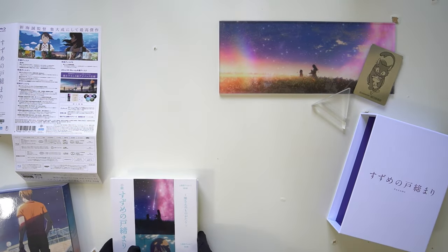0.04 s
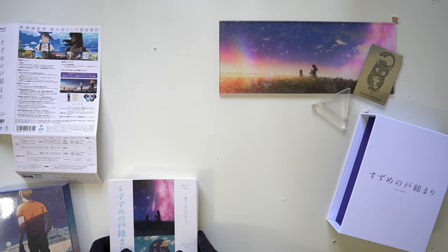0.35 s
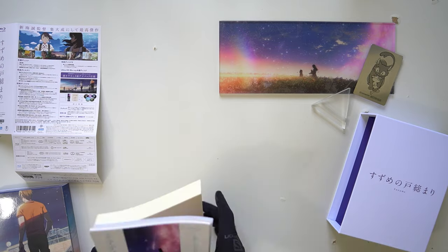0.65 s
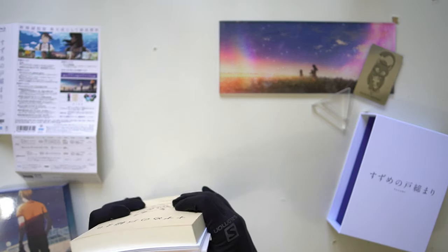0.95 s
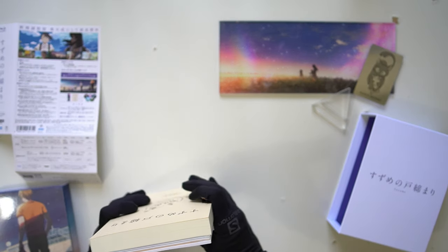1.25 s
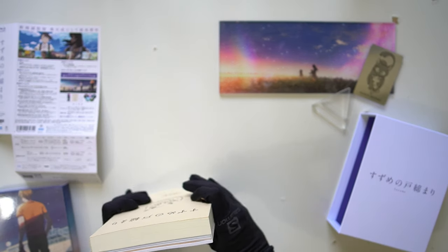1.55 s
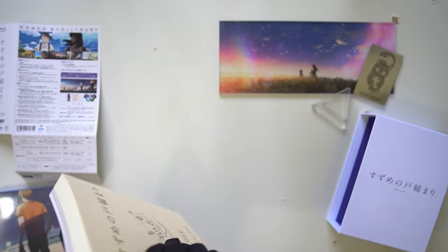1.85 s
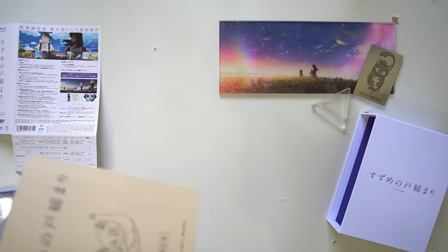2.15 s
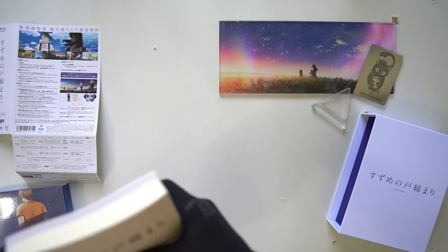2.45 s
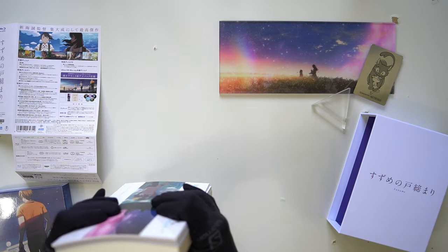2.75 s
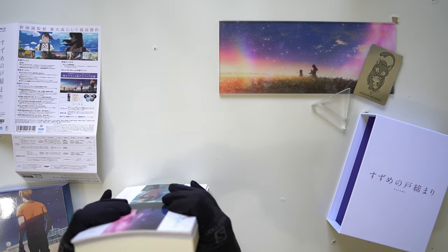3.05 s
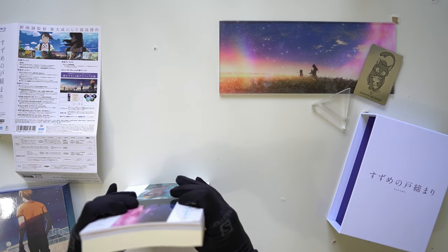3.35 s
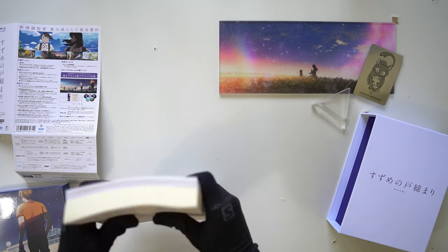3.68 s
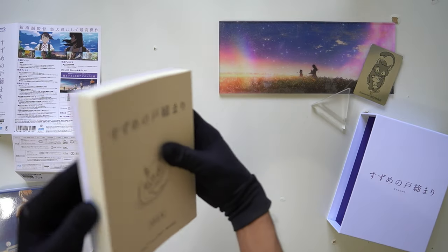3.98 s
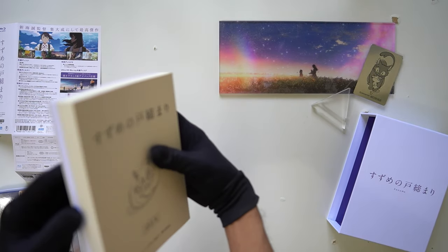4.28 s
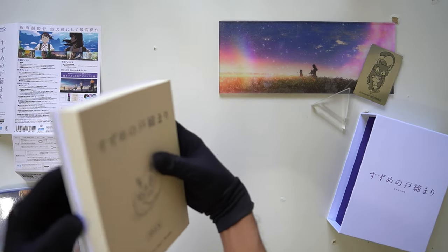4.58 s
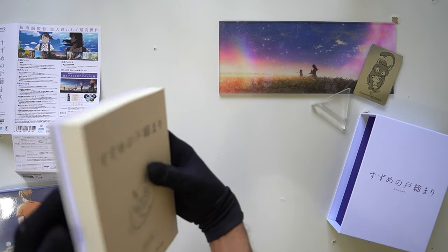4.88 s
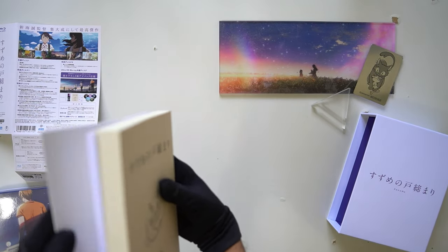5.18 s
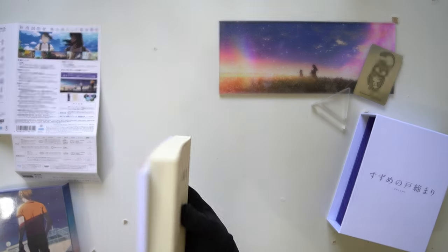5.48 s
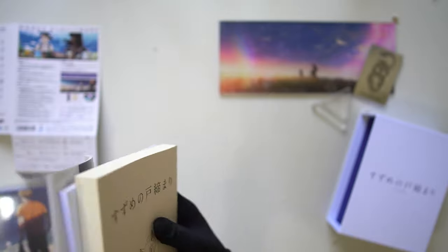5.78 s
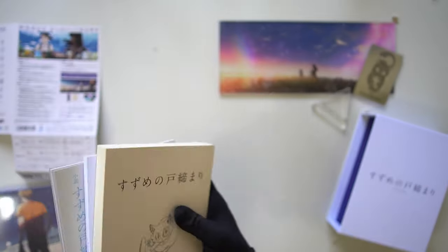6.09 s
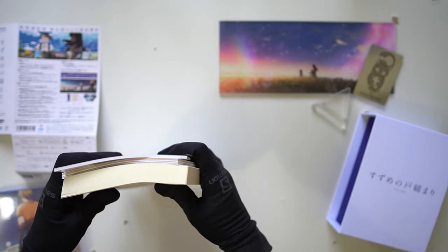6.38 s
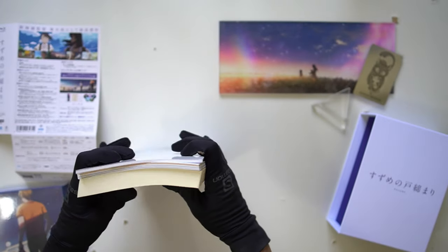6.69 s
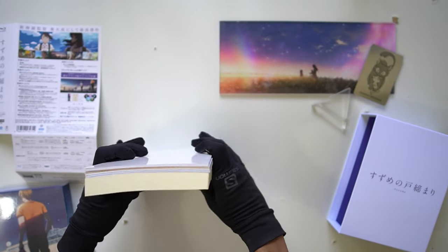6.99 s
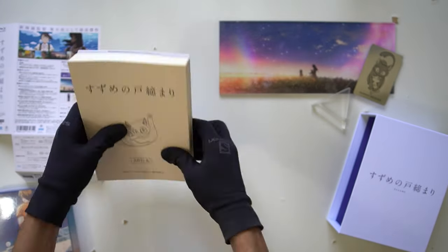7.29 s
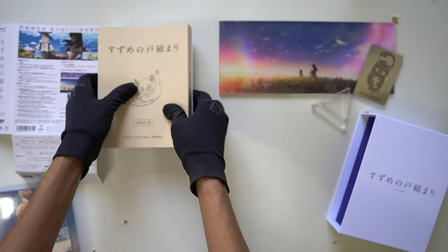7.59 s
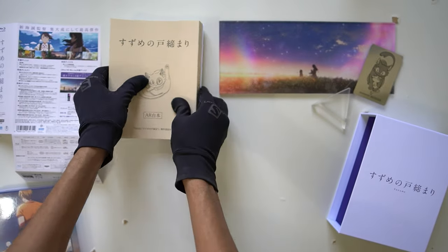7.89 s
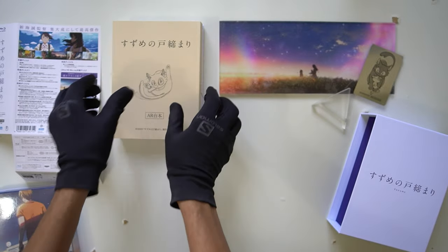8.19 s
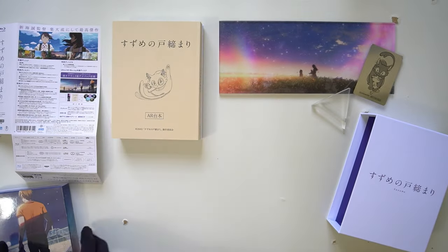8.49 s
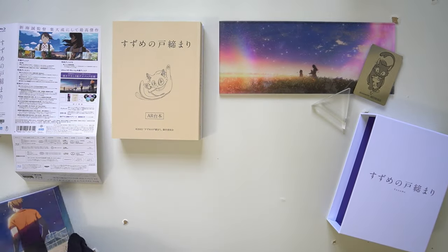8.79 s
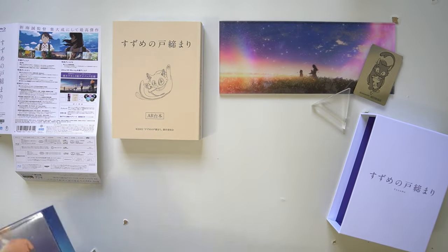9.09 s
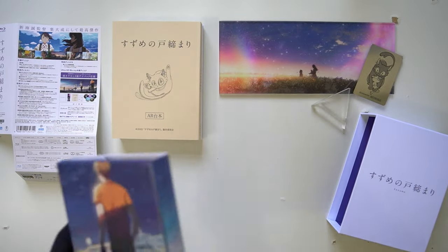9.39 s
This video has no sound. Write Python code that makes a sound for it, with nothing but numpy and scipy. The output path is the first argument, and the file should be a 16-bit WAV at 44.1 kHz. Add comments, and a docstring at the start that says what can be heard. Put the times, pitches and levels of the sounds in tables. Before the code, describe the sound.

Gloved hands handle a thick paperback and a few booklets close to a stereo microphone, in a small quiet room with a low hum. The stack is knocked square on a table in two early bouts, each with booming thuds and slapping pages. Covers slide and flap, and one sheet whisks past another. A third run of knocks follows, then the stack is laid down softly and a case is picked up.

```python
"""Squaring books on a table

Close stereo microphone in a small quiet room with a low steady hum. Gloved hands turn a thick paperback
and a few booklets over and knock the stack square three times: the table booms and rings, the pages slap.
Covers slide and flap, one sheet whisks past another, then the stack is laid down and a case is picked up.
A limiter holds the loudest knocks down."""
import sys
import numpy as np
from scipy import signal
from scipy.fft import rfft, irfft, next_fast_len
from scipy.io import wavfile
from scipy.ndimage import uniform_filter1d, minimum_filter1d, map_coordinates

SR = 44100
rng = np.random.default_rng(int(sys.argv[2]) if len(sys.argv) > 2 else 0)


def dump(signal):
    """Clip the signal to [-1, 1] and save it as 16-bit WAV at the path in sys.argv[1]."""
    limited = np.clip(np.atleast_2d(signal).T, -1, 1)
    pcm = np.round(limited * 32767).astype(np.int16)
    wavfile.write(sys.argv[1], SR, pcm)


N = 416304

# how alike nearby sounds are on the two channels: (frequency [Hz], left-right likeness [0-1])
CLOSE_LIKENESS = [(150, 1), (330, 0.97), (650, 0.83), (1200, 0.66), (2500, 0.54), (6000, 0.44),
                  (12000, 0.34)]


def amp(db):
    """Decibels to gain."""
    return 10 ** (np.asarray(db) / 20)


def unit(x):
    """Scale to rms 1."""
    return x / np.sqrt(np.mean(x ** 2) + 1e-20)


def along(points, hz):
    """Read (frequency [Hz], value) points on a log axis."""
    freqs, values = np.transpose(points)
    return np.interp(np.log(hz + 1), np.log(freqs + 1), values)


def wobble(rate):
    """A smooth random curve, rate knots a second."""
    knots = rng.standard_normal(int(N * rate / SR) + 4)
    return map_coordinates(knots, [np.arange(N) * rate / SR])


def fade(t, t60):
    """Exponential decay, 60 dB down after t60 seconds."""
    return np.exp(-np.log(1000) * t / t60)


def add(track, start, sound):
    """Mix a sound in at start seconds."""
    part = track[:, round(start * SR):][:, :sound.shape[-1]]
    part += sound[..., :part.shape[-1]]


def filtered(x, response):
    """Filter x by a gain that is a function of frequency."""
    n = x.shape[-1]
    padded = next_fast_len(n + 8192)
    hz = np.fft.rfftfreq(padded, 1 / SR)
    return irfft(rfft(x, padded) * response(hz), padded)[..., :n]


def coloured(pair, gain, likeness=CLOSE_LIKENESS):
    """Two unrelated signals become a stereo pair of rms 1 with this gain and likeness over frequency."""
    def mid_side_gains(hz):
        angle = np.arccos(np.clip(along(likeness, hz), -1, 1)) / 2
        return gain(hz) * np.array([np.cos(angle), np.sin(angle)])
    mid, side = filtered(pair, mid_side_gains)
    return unit(np.array([mid + side, mid - side]))


def noise(spectrum, n, likeness=CLOSE_LIKENESS):
    """Stereo noise with a (frequency [Hz], level [dB]) spectrum."""
    return coloured(rng.standard_normal((2, n)), lambda hz: amp(along(spectrum, hz)), likeness)


def room_tone(air_db=-48, drift_rad=0.22, drift_rate=2.82):
    """Soft steady air noise under the slightly unsteady hum of mains and a fan."""
    # moving air: (frequency [Hz], relative level [dB])
    air_spectrum = [(12, -60), (20, -24), (70, -4.5), (85, -30.5), (103, -14.5), (122, -12.5), (148, -9),
                    (427, -15.5), (534, -19.5), (631, -17.5), (1670, -24.5), (2090, -28), (2270, -29.5),
                    (3750, -36), (15500, -48.5)]
    # that air across the two channels: (frequency [Hz], left-right likeness [0-1])
    air_likeness = [(60, 0.99), (180, 0.97), (550, 0.72), (1650, 0.41), (4970, 0.04), (15000, 0.23)]
    # mains and fan tones: (frequency [Hz], rms level [dB])
    hum_lines = [(100, -46.5), (145.3, -54), (188, -59), (776, -69), (872, -68.5), (921, -67.5)]
    t = np.arange(N) / SR
    hum = sum(amp(db) * np.sqrt(2) * np.sin(2 * np.pi * hz * t + drift_rad * wobble(drift_rate))
              for hz, db in hum_lines)
    return amp(air_db) * noise(air_spectrum, N, air_likeness) + hum


def hand_motion(creep_paper_db=-64.5, creep_glove_db=-59.5, restless_db=2, ease_s=0.087, speed_power=1.4):
    """Gains of paper hiss and glove rub: they grow with each stroke's speed, over a faint creep."""
    # the hands never quite stop rubbing while they hold the stack: (start [s], end [s])
    holding = [(0, 1.13), (1.65, 2.83), (3.3, 4.05), (5.45, 8.2), (8.5, 9.2), (9.35, 9.44)]
    # grip shifts: (start [s], speeding up [s], slowing down [s], paper hiss [dB], glove rub [dB])
    strokes = [(.24, 0.17, 0.089, -55.5, -54), (.46, .04, .03, -60, -48.5), (.53, 0.045, 0.13, -57.5, -49),
               (.67, .15, 0.086, -48, -55), (1.2, 0.026, .03, -53, -62), (1.594, 0.018, 0.032, -53, -41),
               (1.62, 0.078, 0.098, -70, -50), (1.74, 0.051, 0.034, -53.5, -63),
               (1.92, 0.079, .05, -61, -70), (2.035, 0.047, .06, -49.5, -51),
               (2.125, .075, 0.029, -47, -61), (2.45, 0.029, 0.03, -46.5, -50),
               (2.522, 0.037, 0.028, -42, -53), (2.56, 0.082, .15, -60, -57),
               (3.26, .24, 0.091, -53.5, -69), (3.59, .015, .05, -53, -51), (3.69, 0.052, 0.27, -57, -57),
               (5.135, 0.08, .17, -55, -44), (5.4, 0.12, .15, -57.5, -75), (5.69, .03, 0.14, -55, -59),
               (5.8, 0.038, 0.12, -53.5, -48), (5.95, 0.11, 0.22, -59, -56), (6.19, .1, 0.056, -49, -49),
               (6.315, 0.039, 0.1, -44.5, -48), (6.599, .048, 0.035, -45, -37.5),
               (6.81, 0.11, 0.1, -47.5, -45.5), (6.91, .08, .075, -46, -50), (7.13, 0.053, 0.44, -59, -60),
               (7.59, 0.16, 0.11, -61.5, -46.5), (7.88, .12, .045, -45.5, -44.5),
               (8.055, 0.039, 0.042, -49.5, -40.5), (8.462, 0.027, 0.24, -56.5, -66),
               (8.58, 0.28, 0.13, -64, -52), (9.205, .06, 0.045, -60.5, -58)]
    t = np.arange(N) / SR
    moving = sum(np.interp(t, [start - ease_s, start, end, end + ease_s], [0, 1, 1, 0])
                 for start, end in holding)
    creep = moving * amp(restless_db * wobble(rate=9))
    paper_power = (amp(creep_paper_db) * creep) ** 2
    glove_power = (amp(creep_glove_db) * creep) ** 2
    for start, speeding, slowing, paper_db, glove_db in strokes:
        fastest = start + speeding
        end = fastest + slowing
        sliding = (t > start) & (t < end)
        speed = np.sin(np.pi / 2 * np.interp(t[sliding], [start, fastest, end], [0, 1, 0]))
        paper_power[sliding] += (amp(paper_db) * speed ** speed_power) ** 2
        glove_power[sliding] += (amp(glove_db) * speed ** speed_power) ** 2
    return np.sqrt(paper_power), np.sqrt(glove_power)


def friction(spectrum, grain_db, judder_db, judder_rate):
    """Fibres catch and slip: dense grains of uneven size under an unsteady stroke."""
    grains = rng.standard_normal((2, N)) * amp(grain_db * wobble(rate=1500))
    hiss = coloured(grains, lambda hz: amp(along(spectrum, hz)))
    return unit(hiss * amp(judder_db * wobble(judder_rate)))


def rubbing():
    """Paper hisses on paper and gloves brush the covers, close to the microphone."""
    # paper sliding on paper: (frequency [Hz], relative level [dB])
    paper_spectrum = [(300, 0), (1500, -8), (3500, -2.5), (6000, -2.5), (9000, -2), (12000, -6),
                      (16000, -9)]
    # cloth on a cover: (frequency [Hz], relative level [dB])
    glove_spectrum = [(200, 4), (700, -7), (1600, -1), (3500, -8), (6000, -15.5), (12000, -47)]
    paper_gain, glove_gain = hand_motion()
    paper = paper_gain * friction(paper_spectrum, grain_db=1.5, judder_db=1.5, judder_rate=58)
    gloves = glove_gain * friction(glove_spectrum, grain_db=3.0, judder_db=2.5, judder_rate=74)
    return paper * amp([[.5], [1.5]]) + gloves * amp([[-.7], [-1]])  # left and right trims


def scuffed_notes(note_trim_db=5.5, scuff_trim_db=-4.5, scuff_t60=0.17, tick_db=6, tick_t60=0.0088):
    """Short damped notes with a scuff: covers flexing, and at 6.509 s a low table ring after the knock."""
    # damped notes: (time [s], note level [dB], pitch [Hz], scuff level [dB])
    notes = [(.247, -39, 182, -44), (0.5138, -33, 338, -62), (0.73, -33.5, 336, -66), (.799, -36, 265, -64),
             (1.611, -55, 404, -41.5), (2.179, -27.5, 257, -41), (2.49, -41, 294, -43),
             (2.577, -36.5, 256, -65), (3.606, -35, 1639, -39), (5.700, -30, 319, -28.5),
             (5.7092, -20.5, 1010, -51), (5.721, -16, 930, -47), (5.894, -25.5, 237, -37.5),
             (5.895, -28, 694, -55), (5.917, -36, 282, -41.5), (6.115, -33, 257, -60),
             (6.128, -39, 272, -34), (6.16, -32.5, 270, -37), (6.509, -25, 165, -52),
             (7.255, -42, 294, -61), (7.352, -42, 326, -50), (7.431, -44.5, 318, -45),
             (8.099, -36.5, 327, -49), (8.55, -34, 910, -32.5), (8.885, -37, 1700, -38),
             (9.346, -52, 350, -47)]
    # the scuff: (frequency [Hz], relative level [dB])
    scuff_spectrum = [(100, -2), (300, 4), (750, 0.5), (1700, -5), (3000, -6.5), (7000, -15.5),
                      (16000, -45)]
    ring_cycles, rise_s = 16.7, 0.00028
    out, t = np.zeros((2, N)), np.arange(SR // 4) / SR
    for start, note_db, hz, scuff_db in notes:
        note = amp(note_db + note_trim_db) * np.sin(2 * np.pi * hz * t) * fade(t, ring_cycles / hz)
        scuff_decay = fade(t, scuff_t60) + amp(tick_db) * fade(t, tick_t60)
        scuff = amp(scuff_db + scuff_trim_db) * noise(scuff_spectrum, len(t)) * scuff_decay
        add(out, start, (note + scuff) * (1 - np.exp(-t / rise_s)))
    return out


def page_slap(t, slap_db, corner_hz, trim_db=2, crack_db=3, crack_t60=0.0083):
    """Page edges crack down and flutter; a softer landing moves their whole band down."""
    # page edges landing: (frequency [Hz], relative level [dB])
    slap_spectrum = [(100, -15), (300, 3.5), (800, 6.5), (1500, 3.5), (2150, 2), (2650, 0), (3400, -0.5),
                     (5500, -4.5), (9000, -19), (16000, -28)]
    # a harder slap flutters longer: (slap level [dB], t60 [s])
    flutter_times = [(-29, 0.33), (-23.5, 0.42)]
    low_share, steepness = 0.081, 2.08

    def contact(hz):
        low_cut = hz / np.hypot(hz, low_share * corner_hz)
        high_cut = 1 / np.sqrt(1 + (hz / corner_hz) ** (2 * steepness))
        return amp(along(slap_spectrum, hz)) * low_cut * high_cut
    flutter_t60 = np.interp(slap_db, *np.transpose(flutter_times))
    decay = fade(t, flutter_t60) + amp(crack_db) * fade(t, crack_t60)
    return amp(slap_db + trim_db) * coloured(rng.standard_normal((2, len(t))), contact) * decay


def air_push(t, panel_db, corner_hz, trim_db=6, corner_share=0.32):
    """The book block pushes out air in one swing of pressure, longer for a soft landing."""
    phase = np.pi * (t * corner_hz * corner_share - 2 / 3)
    return amp(panel_db + trim_db) * (1 - 2 * phase ** 2) * np.exp(-phase ** 2)


def ring(modes, t):
    """Damped modes struck together; neighbours move against each other at the microphone."""
    hz, db, t60 = np.transpose(modes)[:, :, None]
    sign = (-1) ** np.arange(len(modes))[:, None]
    return np.sum(sign * amp(db) * fade(t, t60) * np.sin(2 * np.pi * hz * t), axis=0)


def table_frame(t, boom_db, thud_db, thud_trim_db=2):
    """The whole table booms on its legs and bends with a thud."""
    # bouncing on the legs: (frequency [Hz], relative level [dB], t60 [s])
    bounce_modes = [(55.9, 6, 0.39), (69, 5.5, 0.19)]
    # broad, heavy bending: (frequency [Hz], relative level [dB], t60 [s])
    bending_modes = [(93, 2.5, 0.052), (134, 1, 0.13), (157.5, -9, 0.3), (216, -1.5, 0.041),
                     (343, -13, 0.013)]
    return amp(boom_db) * ring(bounce_modes, t) + amp(thud_db + thud_trim_db) * ring(bending_modes, t)


def table_top(t, panel_db, centre_hz, trim_db=3, t60=0.18, focus_db=8, scatter_db=1, travel_s=0.00303):
    """The top's modes reach the microphone together, as one bending wave, after a short travel time."""
    # the top's higher modes: (frequency [Hz], relative level [dB])
    panel_modes = [(248, -1.5), (282, -3.5), (328, 4), (379, -4.5), (417, -3), (464, -12), (530, -7),
                   (584, -1.5), (703, -7), (770, -5), (824, -9.5), (905, -19), (947, -7.5), (1042, -5.5),
                   (1093, -16.5), (1147, -17), (1373, -9.5), (1416, -26), (1609, -11), (2051, -11.5)]
    hz, db = np.transpose(panel_modes)[:, :, None]
    db = db - focus_db * np.log2(hz / centre_hz) ** 2  # weaker away from the modes the blow drives best
    db = db + scatter_db * rng.standard_normal(hz.shape)
    modes = amp(db) * fade(t, t60) * np.cos(2 * np.pi * hz * (t - travel_s))
    return amp(panel_db + trim_db) * modes.sum(axis=0)


def knocks(rise_s=0.00035):
    """The stack meets the table: pages slap, air is pushed out, frame and top ring."""
    # landings: (time [s], boom [dB], thud [dB], panel ring [dB], most driven panel frequency [Hz],
    # page slap [dB], slap corner [Hz])
    landings = [(1.103, -31, -14.5, -19.5, 284, -26, 1030), (1.129, -58, -27, -22.5, 270, -30.5, 890),
                (1.2240, -32, -21.5, -19, 445, -21.5, 1080), (1.2370, -50, -52, -15.5, 1160, -21.5, 1440),
                (2.9160, -28, -15, -21.5, 480, -27.5, 870), (3.053, -58, -37, -47, 378, -59, 701),
                (3.1210, -31, -15, -16.5, 370, -22, 940), (6.4498, -35, -13.5, -23, 280, -29.5, 694),
                (6.6599, -30, -13.5, -20, 495, -24, 940), (6.7188, -45, -27, -16.5, 530, -22.5, 1040),
                (6.741, -55, -48, -26.5, 454, -28.5, 940), (6.8776, -38.5, -48, -26, 606, -32, 1420),
                (7.655, -37.5, -35.5, -58, 298, -57, 900), (8.110, -40, -42, -48.5, 320, -52, 880),
                (8.551, -48, -42, -38, 660, -40.5, 1370)]
    out, t = np.zeros((2, N)), np.arange(int(.7 * SR)) / SR
    for start, boom_db, thud_db, panel_db, centre_hz, slap_db, corner_hz in landings:
        pages = page_slap(t, slap_db, corner_hz)
        push = air_push(t, panel_db, corner_hz)
        table = table_frame(t, boom_db, thud_db) + table_top(t, panel_db, centre_hz)
        add(out, start, (pages + push + table) * (1 - np.exp(-t / rise_s)))
    return out


def trinket(start_s=1.237, level_db=-47, t60=0.96):
    """A small hard thing on the table rattles faintly, jolted by one hard knock."""
    # its narrow, bright rattle: (frequency [Hz], relative level [dB])
    rattle_spectrum = [(2400, -30), (3000, -14), (3350, 2.5), (3750, -10), (4200, -3), (4800, -10),
                       (6000, -27)]
    out, t = np.zeros((2, N)), np.arange(SR) / SR
    add(out, start_s, amp(level_db) * noise(rattle_spectrum, len(t)) * fade(t, t60))
    return out


def paper_snaps(trim_db=-5.0, t60=0.0072):
    """Tiny bright ticks as paper edges let go."""
    # edges letting go: (time [s], level [dB])
    snaps = [(2.1774, -38), (2.4343, -34), (3.7346, -43), (5.6996, -23.5), (6.125, -24.5), (6.1878, -41),
             (7.2589, -33), (7.2827, -29.5), (7.3512, -43), (7.7524, -28.5), (7.7922, -28.5),
             (7.9592, -24.5), (8.085, -34), (8.5506, -36)]
    # one tick: (frequency [Hz], relative level [dB])
    snap_spectrum = [(500, 0), (2000, -17), (5000, 0), (9000, 9), (12500, 2), (16000, -9)]
    out, t = np.zeros((2, N)), np.arange(SR // 16) / SR
    for start, db in snaps:
        add(out, start, amp(db + trim_db) * noise(snap_spectrum, len(t)) * fade(t, t60))
    return out


def sheet_whisk():
    """One sheet slides past another, to the right of the microphone."""
    # the sheet speeds up and slips free: (time [s], level [dB])
    swell = [(5.14, -67), (5.19, -55.5), (5.275, -44), (5.305, -31), (5.33, -26), (5.357, -22.5),
             (5.369, -40.5), (5.41, -48), (5.47, -77)]
    # its hiss: (frequency [Hz], relative level [dB])
    sheet_spectrum = [(300, -32), (850, -10), (1100, 1.5), (1400, -6), (2200, -5.5), (3000, -1),
                      (4200, -4.5), (5500, 0), (8000, -2.5), (11000, -4), (16000, -8.5)]
    swell_db = np.interp(np.arange(N) / SR, *np.transpose(swell), left=-120, right=-120)
    hiss = friction(sheet_spectrum, grain_db=1.5, judder_db=1.0, judder_rate=110)
    return amp(swell_db) * hiss * amp([[-1.8], [2]])


def room(x, delay_s=.004):
    """The near walls answer, each frequency dying at its own speed."""
    # the small room's decay: (frequency [Hz], t60 [s])
    decay_times = [(100, 0.31), (1000, 0.24), (4000, 0.36), (14000, 0.31)]
    # strength of the reflections: (frequency [Hz], relative level [dB])
    wall_spectrum = [(100, -1.5), (250, 0), (600, 1), (4000, -0.5), (15000, -3.5)]
    hz, t, bands = signal.stft(rng.standard_normal((2, SR // 2)), SR, nperseg=256)
    tail = signal.istft(bands * fade(t, along(decay_times, hz)[:, None]), SR, nperseg=256)[1]
    tail = coloured(tail, lambda hz: amp(along(wall_spectrum, hz)))
    tail = np.pad(tail / np.linalg.norm(tail[0]), ((0, 0), (int(delay_s * SR), 0)))
    return signal.fftconvolve(x.mean(axis=0)[None], tail, axes=1)[:, :N]


def scene():
    """Knocks and handling up close, their reflections and the room tone behind them."""
    table = knocks() + trinket()
    handling = scuffed_notes() + paper_snaps() + rubbing() + sheet_whisk()
    return table + amp(-11.5) * room(table) + handling + amp(-8.5) * room(handling) + room_tone()


def record(dry, low_cut_hz=36, ceiling_db=-4.5, top_hz=15950):
    """The microphone drops the deepest bass, a fast limiter holds the knocks, the top treble is cut."""
    x = signal.sosfilt(signal.butter(2, low_cut_hz, "high", fs=SR, output="sos"), dry)
    needed_gain = np.minimum(1, amp(ceiling_db) / (np.abs(x.mean(axis=0)) + 1e-9))
    held_gain = minimum_filter1d(needed_gain, size=201)
    smooth_gain = uniform_filter1d(held_gain, size=101)
    return filtered(x * smooth_gain, lambda hz: hz < top_hz)


dry = scene()
out = record(dry)
dump(out)
```